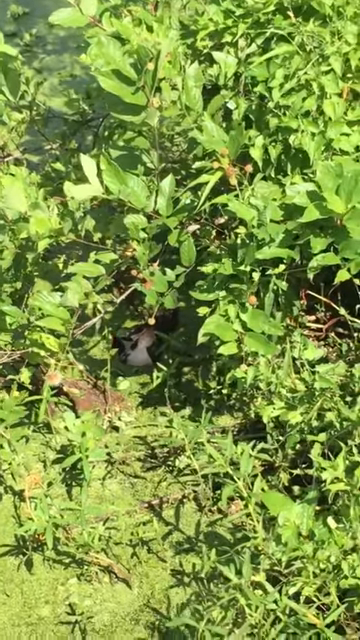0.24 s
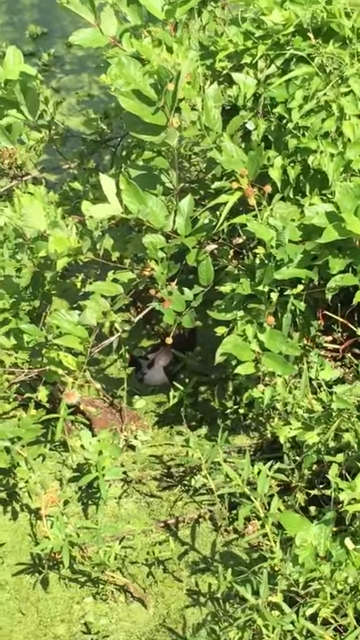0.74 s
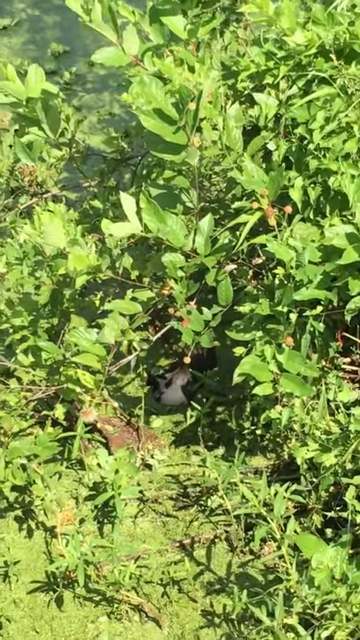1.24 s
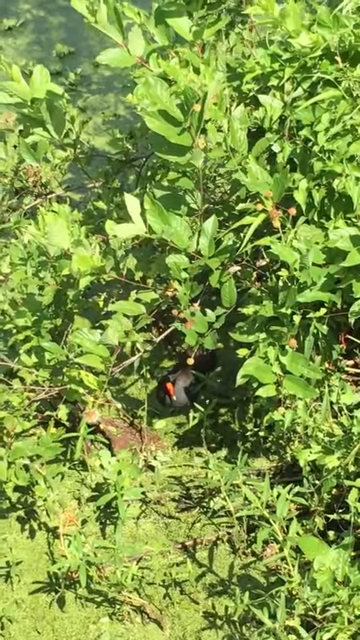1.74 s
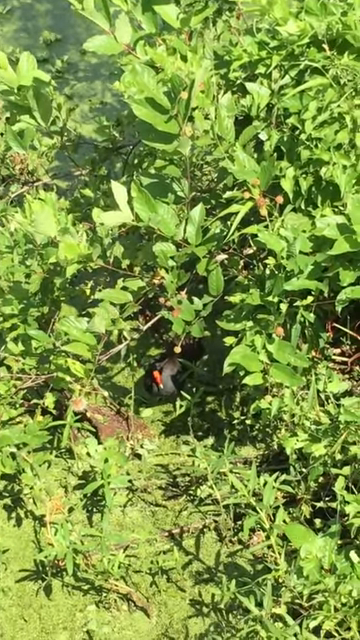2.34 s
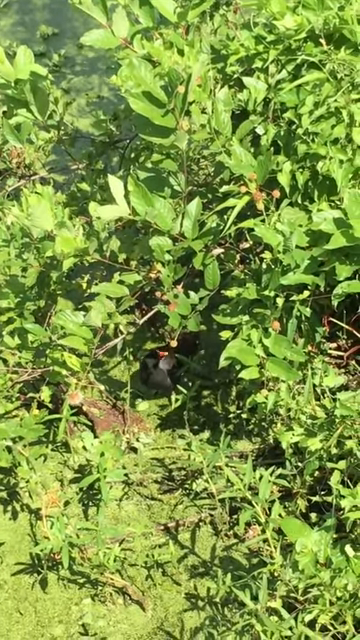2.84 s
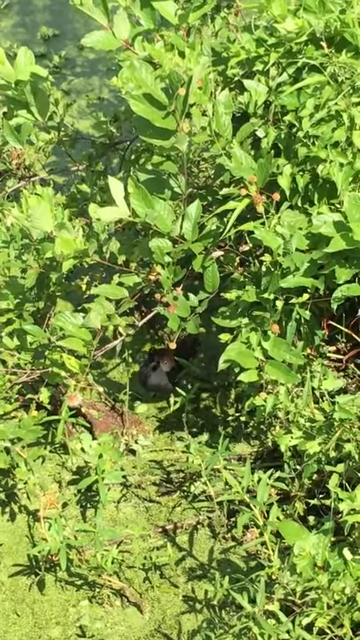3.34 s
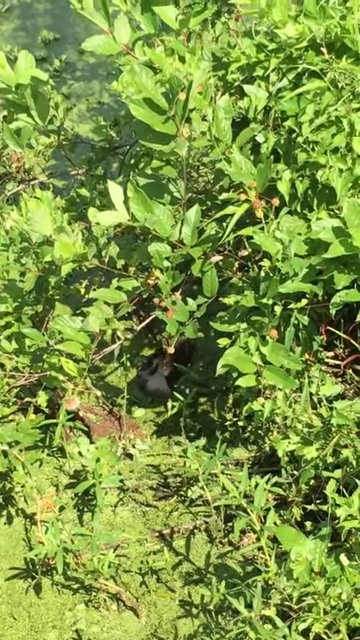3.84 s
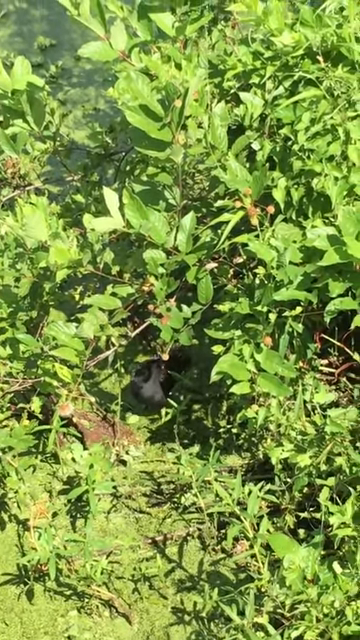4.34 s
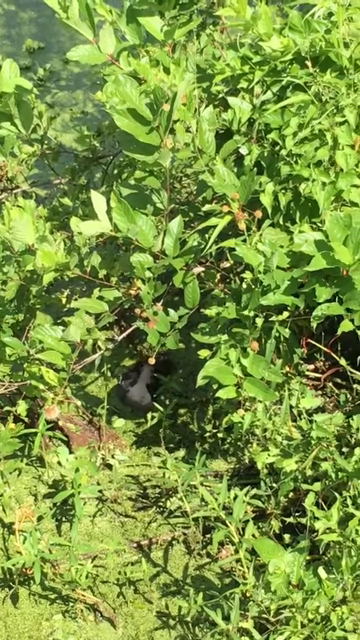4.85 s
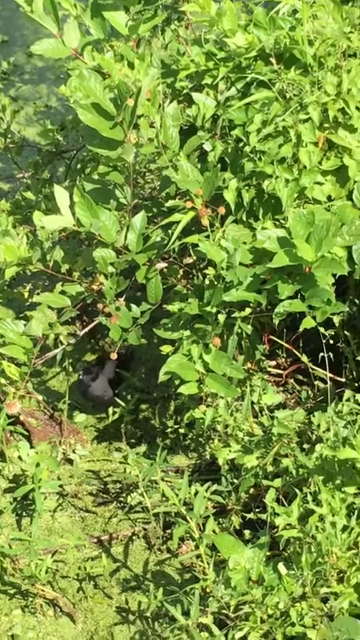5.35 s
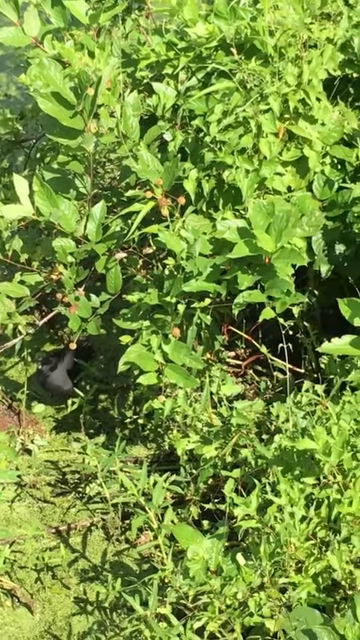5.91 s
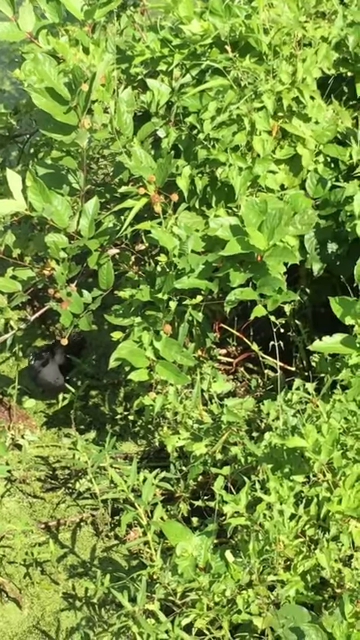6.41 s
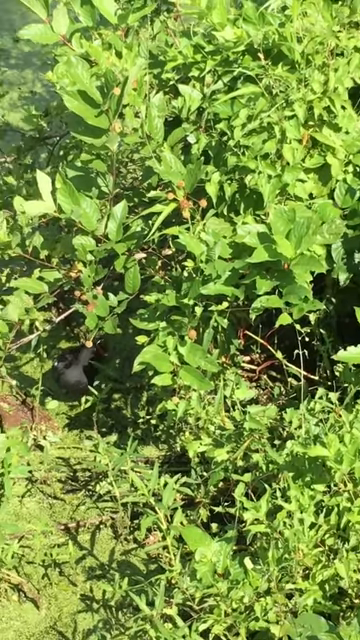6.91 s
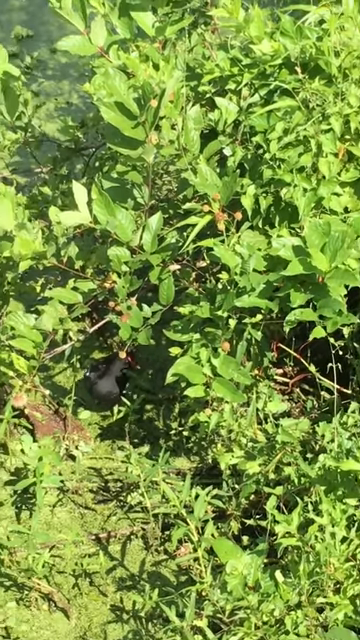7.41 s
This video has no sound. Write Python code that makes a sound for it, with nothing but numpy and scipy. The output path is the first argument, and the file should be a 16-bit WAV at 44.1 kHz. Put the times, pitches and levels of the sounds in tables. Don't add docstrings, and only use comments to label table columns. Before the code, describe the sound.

One piercing, very short waterbird yelp near the start, followed by spaced groups of soft hollow clucks above a steady motor hum and insect buzz.

```python
import sys
import numpy as np
from scipy import signal
from scipy.fft import rfft, irfft, dct, next_fast_len
from scipy.io import wavfile
from scipy.ndimage import uniform_filter1d

SR = 44100
rng = np.random.default_rng(int(sys.argv[2]) if len(sys.argv) > 2 else 0)


def pcm_store(signal):
    levels = np.round(np.clip(np.atleast_2d(signal), -1, 1) * 32767)
    wavfile.write(sys.argv[1], SR, levels.astype(np.int16).T)


def gain_from_db(level_db):
    decades = np.asarray(level_db, float) / 20
    return 10 ** decades


N = 338247

# frequency in Hz, level in dB per Hz.
AIR_SPECTRUM = [(20, -22.5), (50, -0.5), (75, -1.5), (110, -7), (200, -13.5), (400, -25.5), (800, -33),
                (1600, -37.5), (2400, -36.5), (3300, -32), (4800, -36), (7000, -39.5), (8000, -31),
                (9400, -34)]
# time in seconds, firing rate in Hz, level in dB.
MOTOR_COURSE = [(0, 74.8, -54.5), (.32, 74.9, -52), (.6, 74.7, -55), (1.07, 73.41, -56),
                (1.45, 73.6, -54.5), (1.94, 73.53, -52), (2.5, 73.4, -59), (3.14, 73.4, -54),
                (3.44, 73.3, -49.5), (4.64, 73.5, -50), (5.04, 73.5, -55), (5.26, 73.4, -52.5),
                (5.75, 73.05, -50.5), (6.13, 73.1, -54.5), (6.47, 71.8, -48.5), (6.88, 72.02, -52.5),
                (7.3, 72.1, -48), (7.67, 71.96, -46.5)]
# frequency in Hz, level in dB per Hz.
CICADA_SPECTRUM = [(2400, -39.5), (2900, -4.5), (3550, -2.5), (4400, -3.5), (5000, -8.5), (5800, 1),
                   (6700, 1), (7100, 3.5), (7400, -11.5)]
# start and length in seconds, first and last Hz, level in dB.
SLURS = [(1.204, .035, 2760, 2860, -73.5), (1.53, .09, 2555, 2780, -78), (1.62, .14, 2813, 2920, -72.5),
         (3.049, 0.42, 610, 644, -84.5), (3.22, .045, 2900, 3090, -75), (3.261, .075, 3547, 3440, -74),
         (3.33, .06, 3300, 2730, -77), (4.715, .09, 3150, 3320, -66.5), (4.8, .115, 3500, 3670, -64.5),
         (6.918, 0.073, 2950, 2436, -68), (7.044, 0.0614, 2880, 2956, -74),
         (7.097, 0.0717, 3130, 3072, -65.5), (7.17, 0.031, 3090, 3253, -66),
         (7.248, .04, 3860, 3854, -62.5), (7.286, 0.077, 3900, 4084, -67), (7.334, .035, 3560, 2554, -75)]
# start and length in seconds, rim and lowest Hz, level in dB.
SCOOPS = [(1.229, .18, 2860, 2482, -74.5), (3.089, .13, 3040, 2700, -75), (5.415, .04, 2550, 2480, -76),
          (5.563, 0.043, 2550, 2447, -73), (5.685, 0.0549, 2520, 2390, -70.5),
          (5.78, 0.082, 2500, 2410, -73.5), (7.105, .215, 3050, 2100, -71)]
# frequency in Hz, level in dB, fade in dB per second.
HORN_PARTIALS = [(515, -62, -200), (989, -67, 1.2), (1485, -65, -43), (1960, -67, -30.5),
                 (2450, -77.5, -67), (812, -77, 3), (1235, -73, -1), (1648, -76.5, -0.5),
                 (2022, -65.5, -64)]
# start in seconds, peak in dB, frequency in Hz.
BUMPS = [
    (2.601, -35, 55.24),
    (2.649, -34, 73.8),
    (6.86, -44.5, 302.7),
]
# start in seconds, peak in dB, pitch in Hz, second partial in dB, closing knock in dB.
CLUCKS = [(0.04, -47, 1111, -15.5, -0.5), (2.015, -57, 1035, -12.5, -10.5), (2.091, -47.5, 1037, -4, -2.5),
          (2.193, -42, 1026, -2.5, -5.5), (2.3, -40.5, 1026, 2.5, 0.5), (3.724, -60.5, 1043, -18.5, -9.5),
          (3.801, -52, 1099, -14.5, -13), (3.893, -43.5, 1041, -8.5, -3.5), (4.009, -43.5, 1059, -9, -8.5),
          (5.872, -55, 990, -10.5, -11), (5.955, -48.5, 1098, -14.5, -6.5), (6.061, -42.5, 997, -3.5, -1.5),
          (6.179, -45, 996.4, 2.2, 0.5)]
# seconds, dB, Hz, dB, dB.
CATCH = (.149, -46, 1070, -18, -30)
# multiple of the pitch, level in dB re the fundamental.
CLUCK_UPPER = [(3, -17), (4, -20), (5, -16), (6, -20)]
# multiple of the pitch, level in dB, steepness in dB per dB of effort.
YELP_PARTIALS = [(2, -0.5, 0.23), (3, -8, 1.6), (4, -3.5, 0.37), (5, -15, 0.11), (6, -14.5, 0.71),
                 (7, -11, 0.62), (8, -23, 1.2), (9, -18, 1.2)]
# frequency in Hz, width in Hz, level in dB.
BILL = [(4010, 610, 2), (4610, 600, -14), (6590, 1100, -12), (8900, 700, -21), (1860, 1300, -12)]
# delay in seconds, level in dB.
ECHOES = [
    (.011, -14),
    (0.02, -24.5),
    (0.04, -28.5),
    (0.131, -37),
]
# start in seconds, t60 in seconds, level in dB, dulled above in Hz.
SCATTER = [
    (0.0036, 0.084, -11, 7200),
    (0.023, 0.55, -26.5, 6700),
    (0.023, .6, -12.5, 504),
    (.125, .3, -25.5, 5900),
]
# frequency in Hz, rounding step in dB over the local level.
GRAIN_STEP = [(900, -35), (1700, -3), (4500, 3), (7000, 4), (8500, 5.5), (9100, 8.5), (9600, 14)]


def rms_one(x):
    return x / np.sqrt(np.mean(x ** 2) + 1e-20)


def span(t0, t1):
    return np.arange(round(t0 * SR), min(round(t1 * SR), N))


def turns(hz):
    return 2 * np.pi * np.cumsum(hz) / SR


def drift(rate_hz, size):
    r = np.exp(-2 * np.pi * rate_hz / SR)
    settled = signal.lfilter([1], [1, -2 * r, r * r], rng.standard_normal(size + SR))[SR:]
    return rms_one(settled)


def resonance(x, hz, width_hz):
    r = np.exp(-np.pi * width_hz / SR)
    gain = (1 - r * r) / 2
    return signal.lfilter([gain, 0, -gain], [1, -2 * r * np.cos(2 * np.pi * hz / SR), r * r], x)


def double_resonance(x, hz, width_hz):
    return resonance(resonance(x, hz, width_hz), hz, width_hz)


def coloured(spectrum):
    size = next_fast_len(N)
    hz = np.maximum(np.arange(size // 2 + 1) * SR / size, 1)
    points_hz, points_db = np.transpose(spectrum)
    shape_db = np.interp(np.log(hz), np.log(points_hz), points_db, left=-60, right=-60)
    return rms_one(irfft(rfft(rng.standard_normal(size)) * gain_from_db(shape_db), size)[:N])


def air():
    return gain_from_db(-55 + 0.98 * drift(1.416, N)) * coloured(AIR_SPECTRUM)


def motor(t):
    times, rates, levels = np.transpose(MOTOR_COURSE)
    hz, level_db = np.interp(t, times, rates), np.interp(t, times, levels)
    smear = rms_one(resonance(rng.standard_normal(N), 73.9, 6.24))
    tone = np.sin(turns(hz + 0.41 * drift(3.3, N)))
    return gain_from_db(level_db + 1.3 * drift(4.3, N)) * (1.33 * tone + 0.29 * smear)


def cicadas(t):
    full_db, quiet_db, creep_db_per_s = -65.5, -13.5, 1.9
    swell_s, swell_width_s, fade_s, fade_db_per_s = 3, 0.23, 7.2, 8
    quiet = 1 / (1 + np.exp((t - swell_s) / swell_width_s))
    level_db = full_db + quiet * (quiet_db + creep_db_per_s * t) - fade_db_per_s * np.maximum(t - fade_s, 0)
    throb = np.cos(turns(8.9 + 0.44 * drift(0.65, N)))
    buzz = coloured(CICADA_SPECTRUM) * gain_from_db(0.81 * throb + 1.21 * drift(13, N))
    sharp = rms_one(double_resonance(rng.standard_normal(N), 3550, 90)) * gain_from_db(3.9 * throb - 11.5)
    return gain_from_db(level_db + 1.5) * (buzz + sharp)


def cricket():
    trill = rms_one(double_resonance(rng.standard_normal(N), 8570, 110)) * gain_from_db(1.2 * drift(30, N))
    upper = rms_one(double_resonance(rng.standard_normal(N), 8950, 153)) * gain_from_db(-5)
    return gain_from_db(-76 + 1.5) * (trill + upper)


def whistle(hz, level_db):
    hz = uniform_filter1d(hz, size=400, mode="nearest")
    flutter_db = 1.8 * drift(40, len(hz))
    return gain_from_db(level_db + 1.5 + flutter_db) * np.sin(turns(hz)) * signal.windows.tukey(len(hz), .15)


def songbirds():
    ease = 3.5
    low_at, start_share = 0.3, 0.84
    out = np.zeros(N)
    for s, length, first_hz, last_hz, level_db in SLURS:
        at = span(s, s + length)
        done = np.linspace(0, 1, len(at))
        share = 1 - (1 - done) ** ease
        out[at] += whistle(first_hz + (last_hz - first_hz) * share, level_db)
    for s, length, rim_hz, lowest_hz, level_db in SCOOPS:
        at = span(s, s + length)
        done = np.linspace(0, 1, len(at))
        climb = np.clip((done - low_at) / (1 - low_at), 0, 1)
        depth = 1 - np.sin(np.pi / 2 * climb) - start_share * np.clip(1 - done / low_at, 0, 1)
        out[at] += whistle(rim_hz + (lowest_hz - rim_hz) * depth, level_db)
    return out


def horn():
    start_s, attack_s, hold_s, drop_s = 6.372, 0.01, 0.084, .05
    echo_db, echo_s = -6, .19
    steps = start_s + np.cumsum([0, attack_s, hold_s, drop_s, echo_s, drop_s])
    at, out = span(steps[0], steps[-1]), np.zeros(N)
    level_db = np.interp(at / SR, steps, [-30, 0, 0, echo_db, echo_db - 3.5, -22])
    elapsed = (at - at[0]) / SR
    for hz, partial_db, fade_db_per_s in HORN_PARTIALS:
        waver_db = 3.2 * drift(25, len(at))
        tone = np.sin(turns(hz + 6 * drift(25, len(at))))
        out[at] += gain_from_db(partial_db + level_db + fade_db_per_s * elapsed + waver_db) * tone
    return out


def bumps():
    out = np.zeros(N)
    for s, peak_db, hz in BUMPS:
        t = np.arange(round(3 * SR / hz)) / SR
        out[round(s * SR) + np.arange(len(t))] += gain_from_db(peak_db) * np.sin(2 * np.pi * hz * t) * np.exp(-1.6 * hz * t)
    return out


def clucks():
    out, t = np.zeros(N), np.arange(SR // 10) / SR
    muffle = signal.butter(4, 1800, fs=SR, output="sos")
    for s, peak_db, hz, second_db, knock_db in [*CLUCKS, CATCH]:
        length = 7.5 / hz
        done = np.minimum(t / length, 1)
        phase = turns(hz * (1 - 0.039 * (1 - done) ** 6 - 0.2 * done ** 4))
        swell = done ** 0.37 * (1 - done) ** 1.5
        upper = sum(gain_from_db(g_db) * np.sin(k * phase) for k, g_db in CLUCK_UPPER) * (1 - done)
        tone = (np.sin(phase) + gain_from_db(second_db) * np.sin(2 * phase + 1) + upper) * swell / swell.max()
        tone = tone + gain_from_db(-6.5) * (resonance(tone, hz, 45) + resonance(tone, 2 * hz, 45))
        sacs = resonance(tone, hz, 14) + resonance(tone, 2 * hz, 14)
        tone = tone + gain_from_db(-10 + 4.5 * drift(70, len(t))) * sacs
        burst = rng.standard_normal(len(t)) * np.exp(-np.abs(t - length - .002) / .0012)
        burst = signal.sosfilt(muffle, burst)
        knock = resonance(burst, 0.92 * hz, 900) + gain_from_db(second_db - 9) * resonance(burst, 1.05 * hz, 500)
        cluck = tone + gain_from_db(knock_db) * knock / np.abs(knock).max()
        out[round(s * SR) + np.arange(len(t))] += gain_from_db(peak_db) * cluck
    return out


def yelp():
    start_s, crest_s, slack_s, end_s, attack_s = .157, .174, 0.1901, .205, 0.006
    at, out = span(start_s, end_s + .01), np.zeros(N)
    t = at / SR
    off, slack = np.abs(t - crest_s), np.maximum(t - slack_s, 0)

    crest_hz, sag_hz, sag_after_s, rise_power, sag_power = 986, 173, .017, 2.9, 2.45
    power = np.where(t < crest_s, rise_power, sag_power)
    phase = turns(np.maximum(crest_hz - sag_hz * (off / sag_after_s) ** power, 300))

    effort_db = 12 * (np.exp(-(off / 0.0061) ** 2) - 1)
    level_db = -20.5 + 0.16 * effort_db - 3194 * slack
    rasp_db = -26 - 796 * np.maximum(slack_s - t, 0) - 1500.5 * slack
    chest_db = level_db - 14 + 0.61 * effort_db + np.minimum(3297.5 * slack, 30)
    voiced = (t < end_s) * np.clip((t - start_s) / attack_s, 0, 1)

    tone = sum(gain_from_db(level_db + g_db + steep * effort_db + 3.0) * np.cos(k * phase + 1.3 * k)
               for k, g_db, steep in YELP_PARTIALS)
    tone = tone * (1 + gain_from_db(-16.5 + 9.9 * effort_db) * np.cos(phase / 2))
    chest = gain_from_db(chest_db + 3.5) * np.sin(phase)

    opening = np.exp(4 * (np.cos(phase) - 1))
    puffs = gain_from_db(rasp_db + 22.5) * opening * (rng.standard_normal(len(at)) + 0.59) * voiced
    rasp = sum(gain_from_db(g_db) * double_resonance(puffs, hz, 1.7 * width_hz) for hz, width_hz, g_db in BILL)
    out[at] = (tone + chest) * voiced + rasp
    return out


def marsh(x, direct=1):
    t = np.arange(SR * 7 // 10) / SR
    paths = np.zeros(len(t))
    for start, t60, level_db, dull_hz in SCATTER:
        decay_db = -60 * t / t60 + 3.1 * drift(35, len(t))
        haze = rng.standard_normal(len(t)) * gain_from_db(decay_db) * (t > start)
        keep = np.exp(-2 * np.pi * dull_hz / SR)
        dulled = signal.lfilter([1 - keep], [1, -keep], haze)
        paths += gain_from_db(level_db) * dulled / np.sqrt(np.sum(haze ** 2))
    paths = paths - 0.73 * resonance(paths, 1890, 1300)
    for lag, level_db in ECHOES:
        paths[round(lag * SR)] += gain_from_db(level_db)
    return direct * x + signal.fftconvolve(x, paths)[:N]


def scene():
    t = np.arange(N) / SR
    background = air() + motor(t) + cicadas(t) + cricket()
    far_birds = marsh(songbirds(), direct=0.62) * gain_from_db(5)
    bird = marsh(yelp() + clucks())
    return (background + far_birds + horn() + bumps() + bird)[None]


def grainy_spectrum(x, size=1024):
    half, count = size // 2, N // size + 2
    window = np.sin(np.pi * (np.arange(2 * size) + .5) / (2 * size))
    index = np.arange(count + 1)[:, None] * size + np.arange(2 * size)
    frames = np.pad(x, (size, 3 * size))[index] * window
    a, b, c, d = np.split(frames, 4, axis=1)
    lines = dct(np.hstack([-c[:, ::-1] - d, a - b[:, ::-1]]), type=4, norm="ortho")
    local = np.sqrt(uniform_filter1d(lines ** 2, size=70, axis=1) + 1e-18)
    local = np.minimum(local, gain_from_db(6) * np.median(local, axis=0))
    hz, step_db = np.transpose(GRAIN_STEP)
    whim = uniform_filter1d(rng.standard_normal((count + 1, size // 10 + 1)), size=3, axis=0)
    whim = whim.repeat(10, axis=1)[:, :size]
    step = local * gain_from_db(np.interp(np.arange(size) * SR / size / 2, hz, step_db) + 5.5 * whim)
    rounded = np.sign(lines) * step * np.floor(np.abs(lines) / step + .4)
    folded = dct(rounded, type=4, norm="ortho")
    u, v = folded[:, :half], folded[:, half:]
    frames = np.hstack([v, -v[:, ::-1], -u[:, ::-1], -u]) * window
    return (frames[1:, :size] + frames[:-1, size:]).ravel()[:N]


def band_limit(x):
    return signal.sosfilt(signal.butter(12, 9930, fs=SR, output="sos"), x)


def record(dry):
    mix = grainy_spectrum(dry[0])[None]
    return band_limit(mix)


dry = scene()
out = record(dry)
pcm_store(out)
```